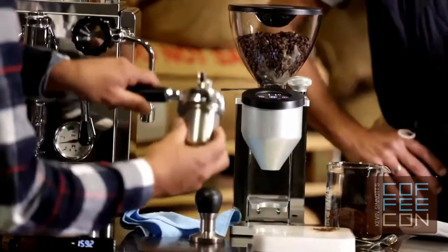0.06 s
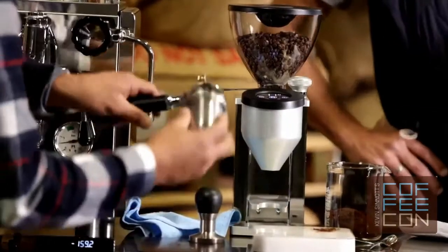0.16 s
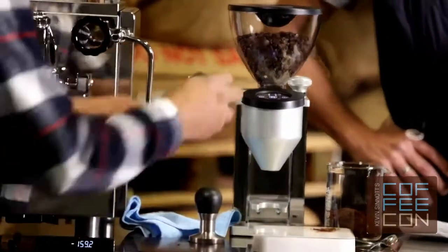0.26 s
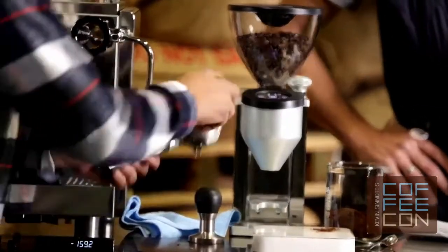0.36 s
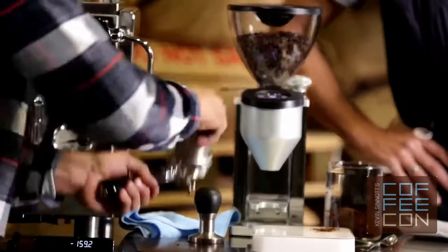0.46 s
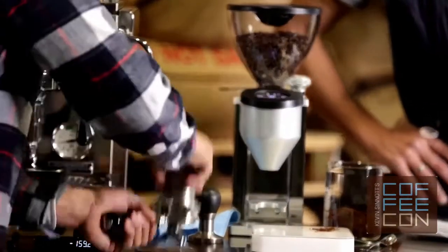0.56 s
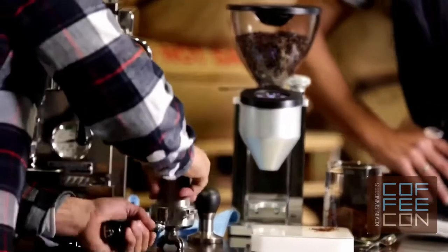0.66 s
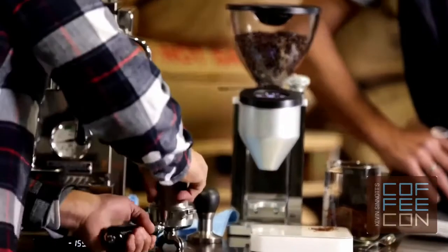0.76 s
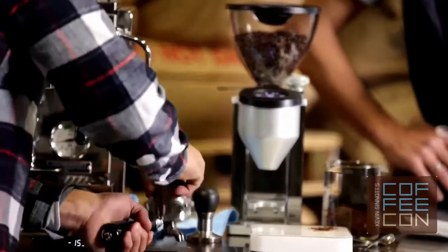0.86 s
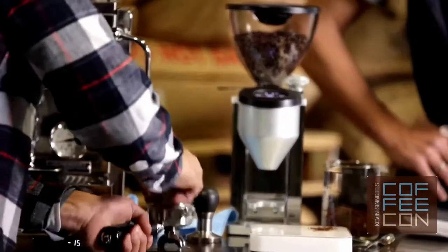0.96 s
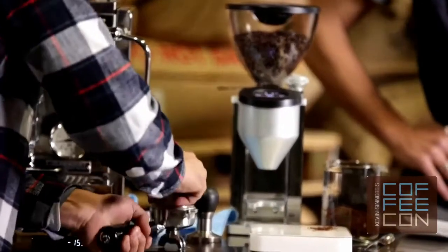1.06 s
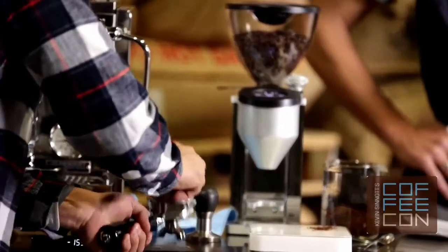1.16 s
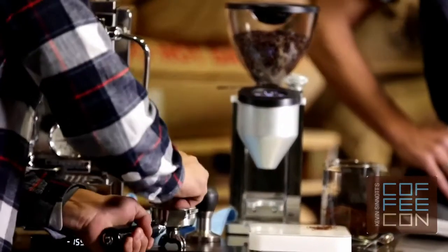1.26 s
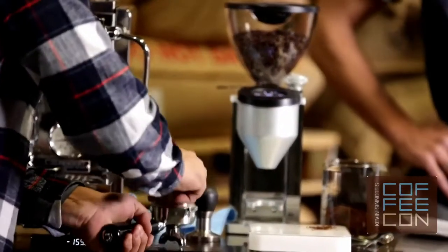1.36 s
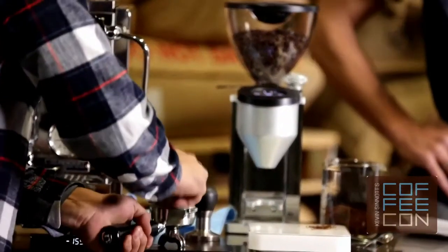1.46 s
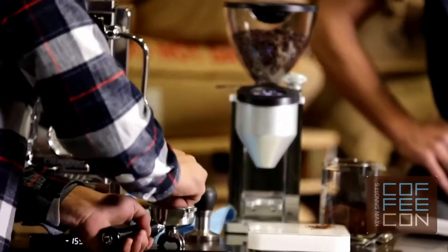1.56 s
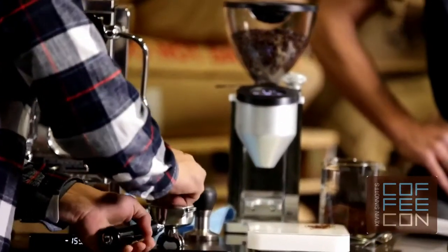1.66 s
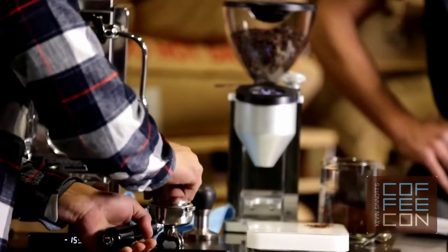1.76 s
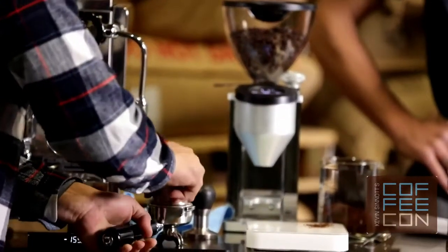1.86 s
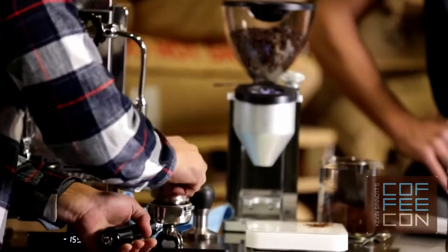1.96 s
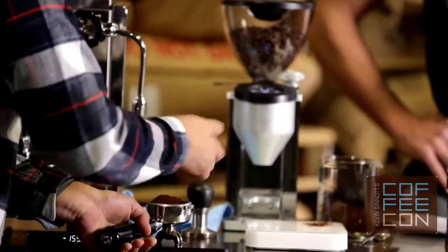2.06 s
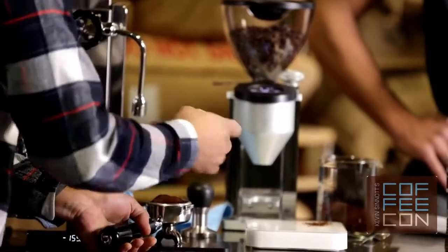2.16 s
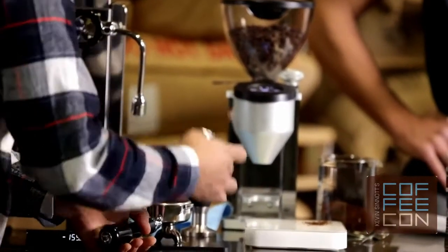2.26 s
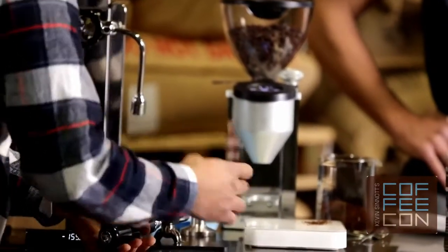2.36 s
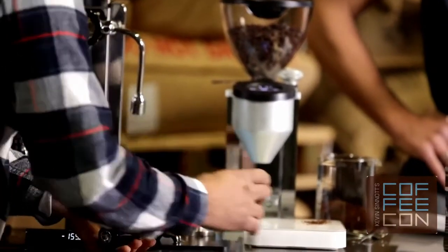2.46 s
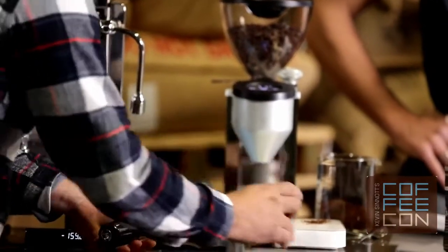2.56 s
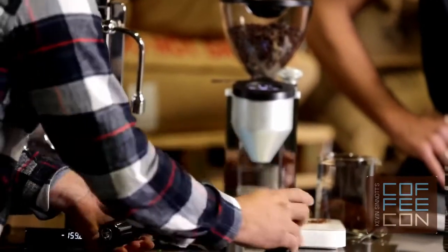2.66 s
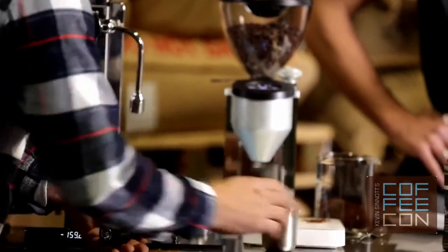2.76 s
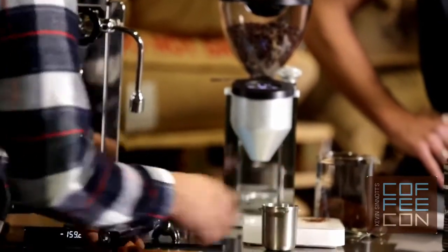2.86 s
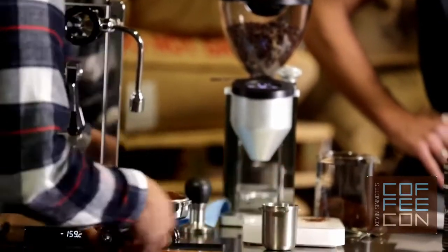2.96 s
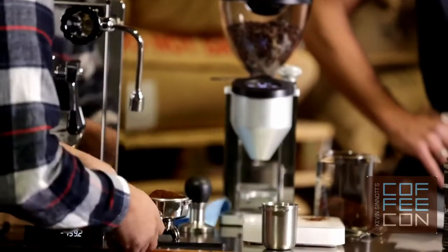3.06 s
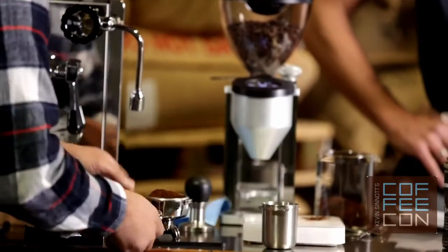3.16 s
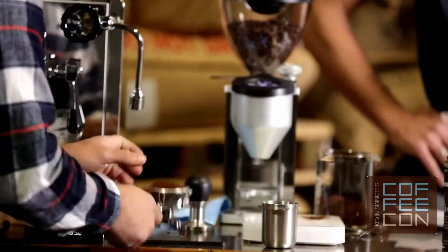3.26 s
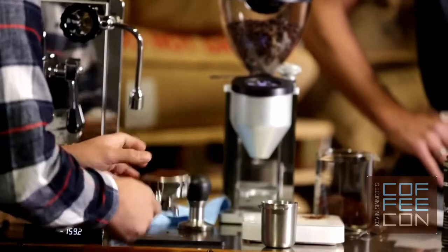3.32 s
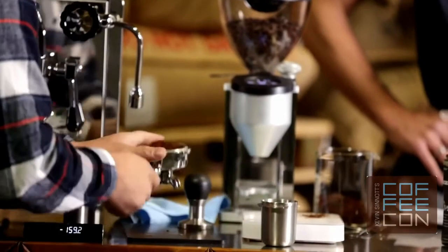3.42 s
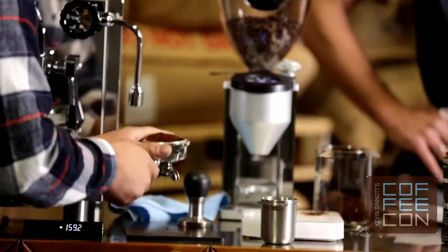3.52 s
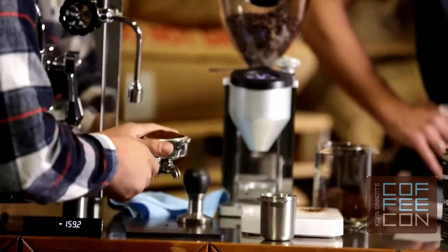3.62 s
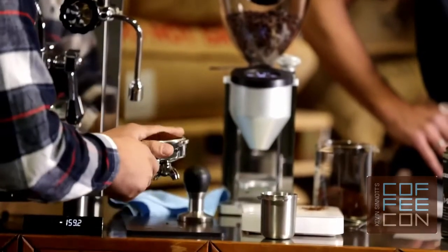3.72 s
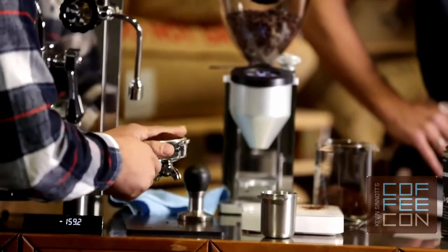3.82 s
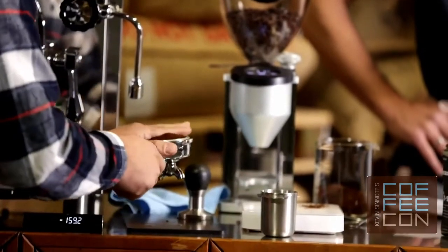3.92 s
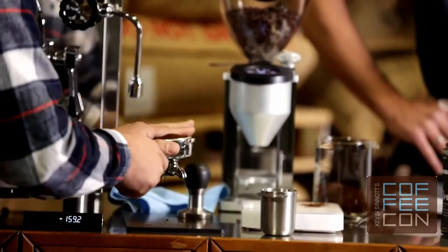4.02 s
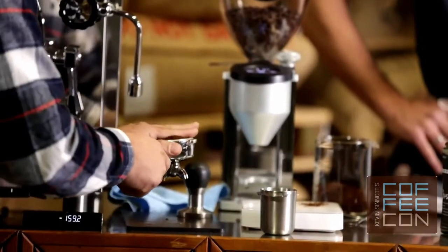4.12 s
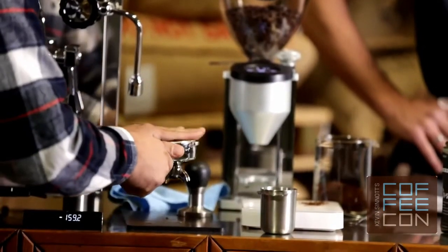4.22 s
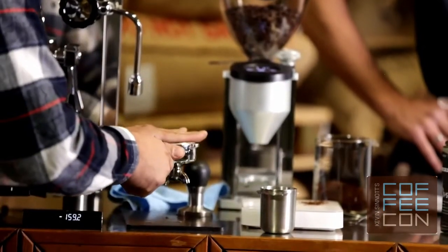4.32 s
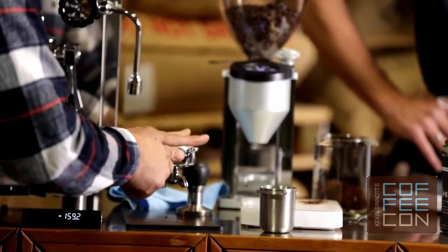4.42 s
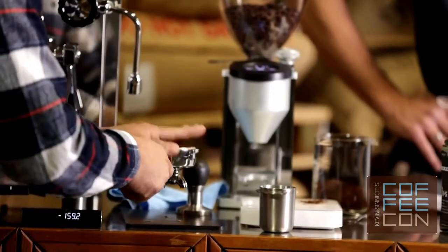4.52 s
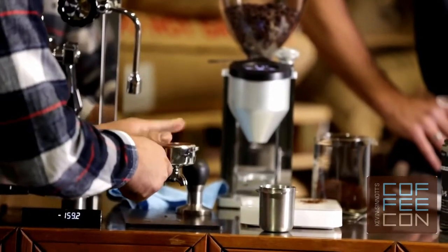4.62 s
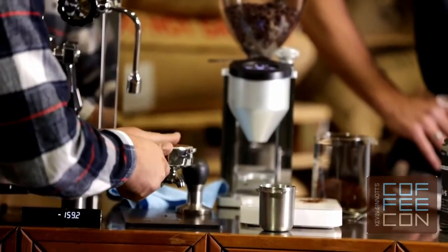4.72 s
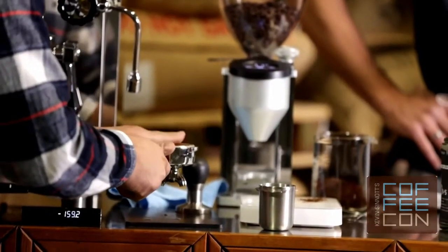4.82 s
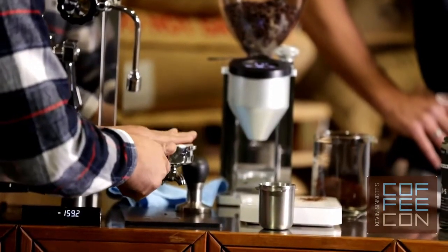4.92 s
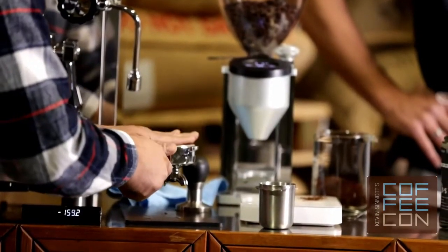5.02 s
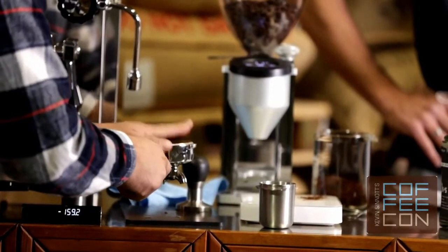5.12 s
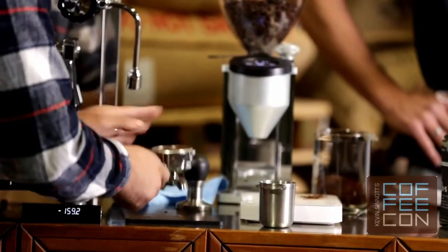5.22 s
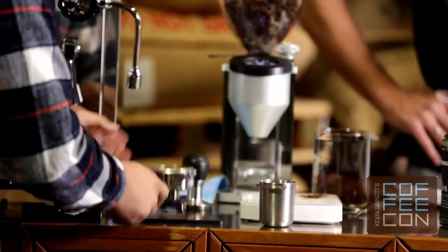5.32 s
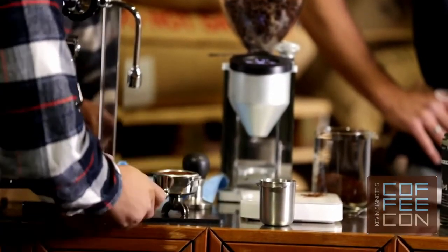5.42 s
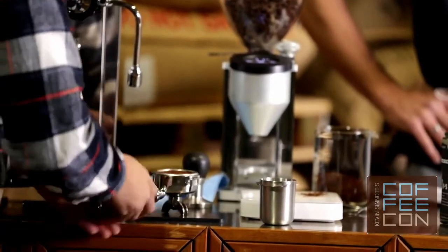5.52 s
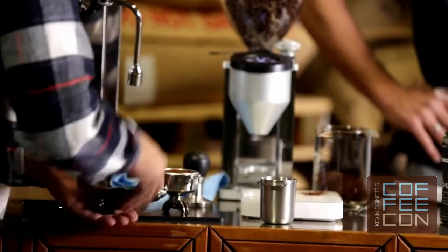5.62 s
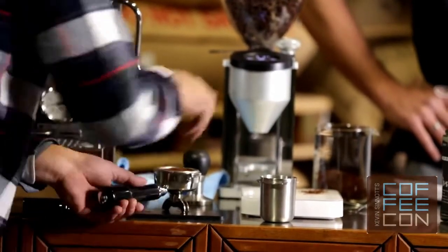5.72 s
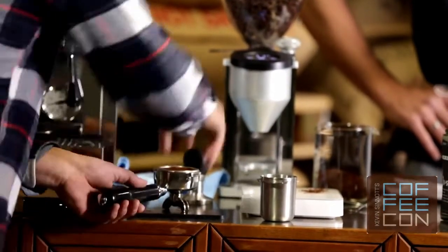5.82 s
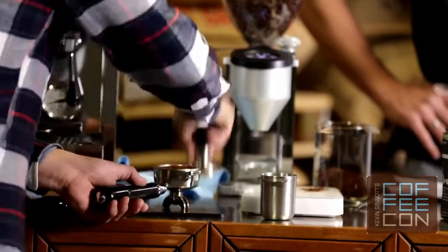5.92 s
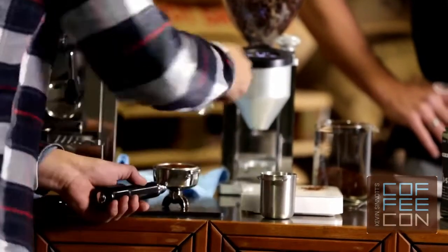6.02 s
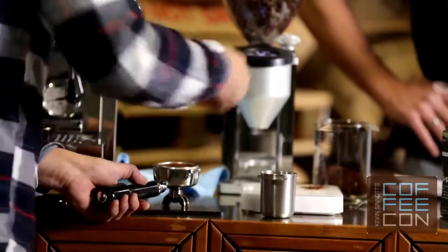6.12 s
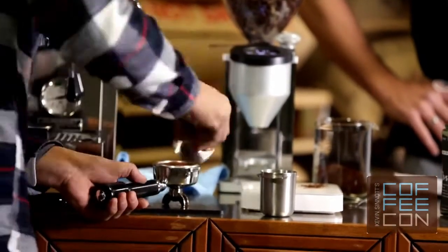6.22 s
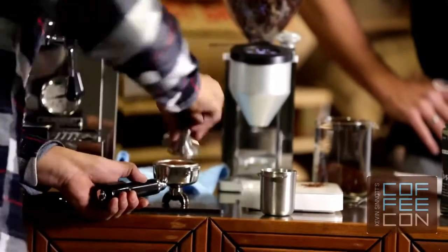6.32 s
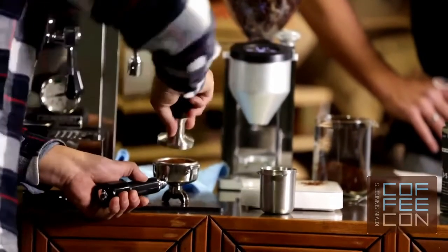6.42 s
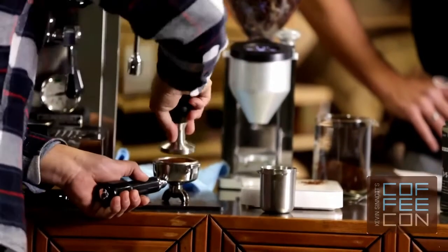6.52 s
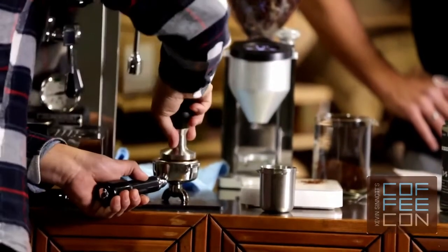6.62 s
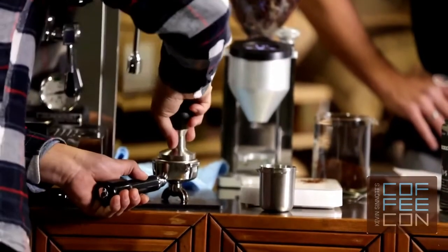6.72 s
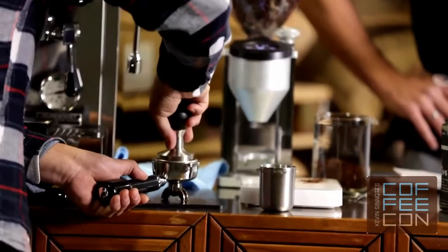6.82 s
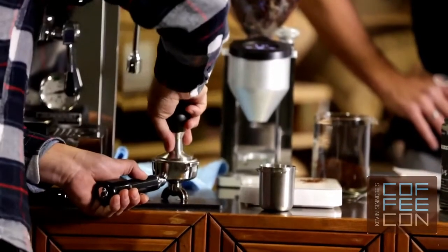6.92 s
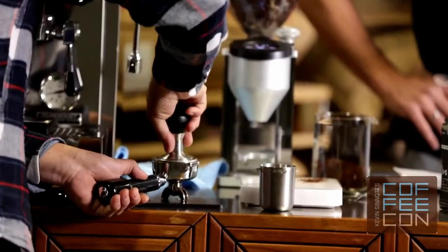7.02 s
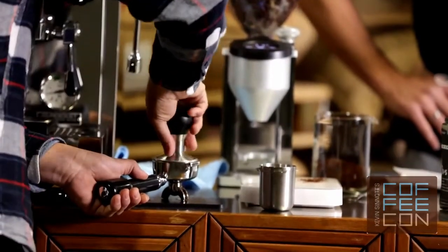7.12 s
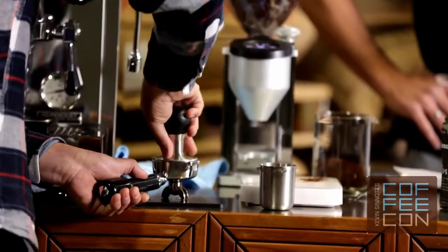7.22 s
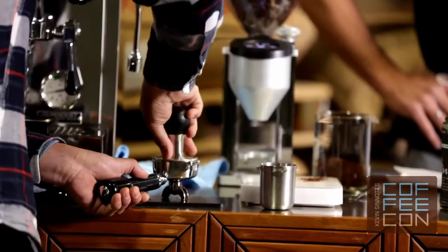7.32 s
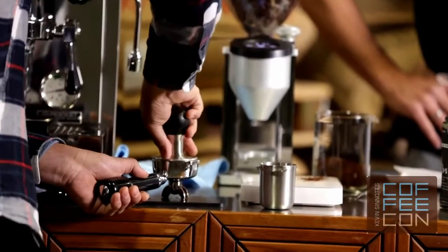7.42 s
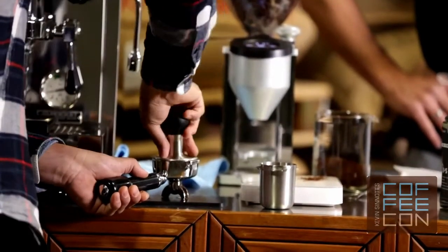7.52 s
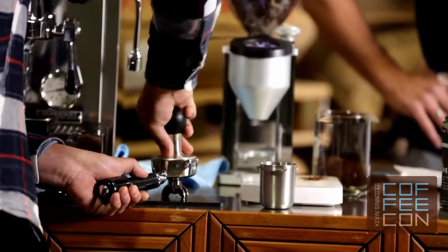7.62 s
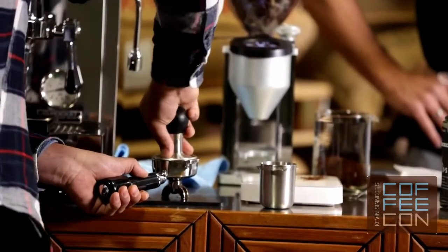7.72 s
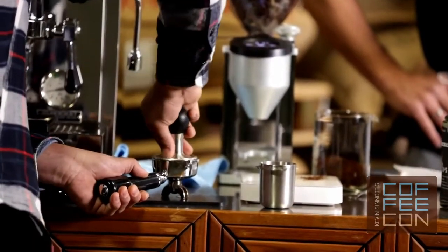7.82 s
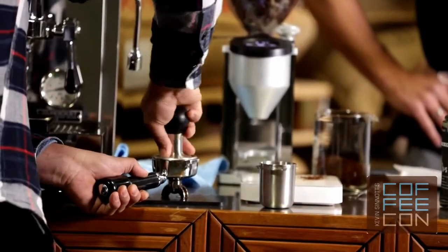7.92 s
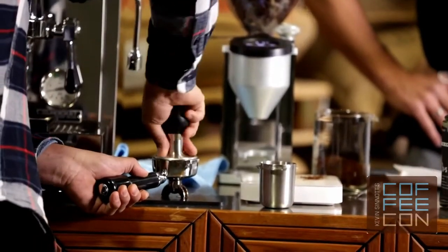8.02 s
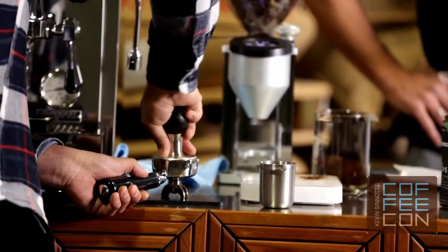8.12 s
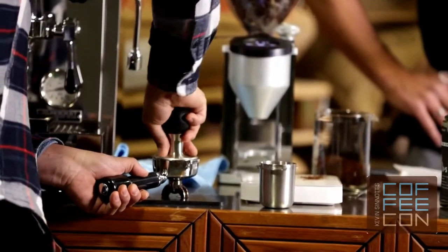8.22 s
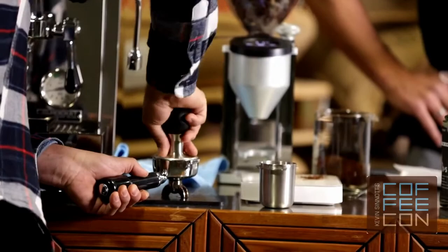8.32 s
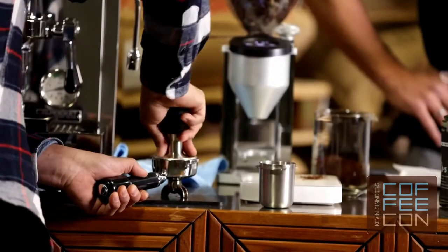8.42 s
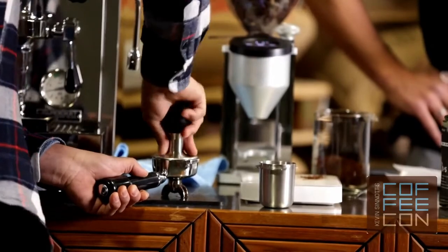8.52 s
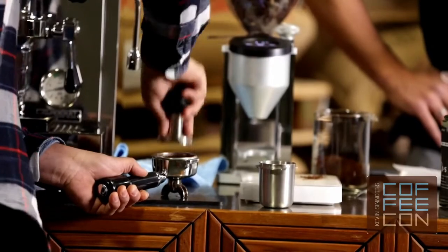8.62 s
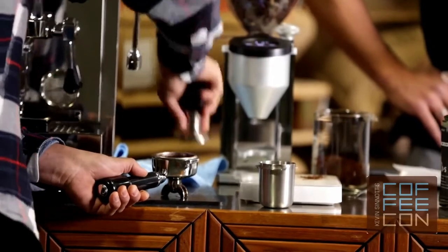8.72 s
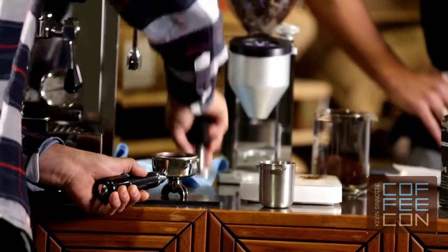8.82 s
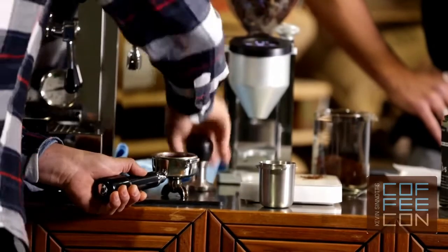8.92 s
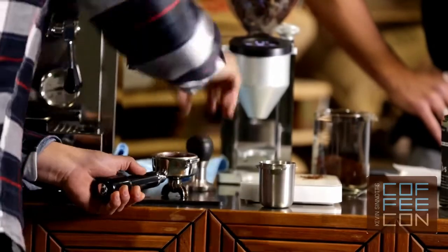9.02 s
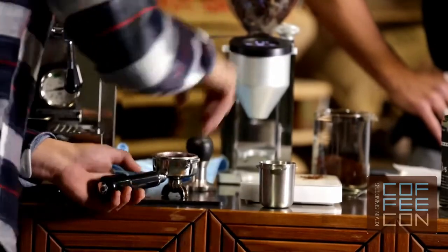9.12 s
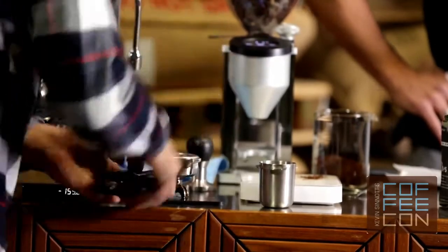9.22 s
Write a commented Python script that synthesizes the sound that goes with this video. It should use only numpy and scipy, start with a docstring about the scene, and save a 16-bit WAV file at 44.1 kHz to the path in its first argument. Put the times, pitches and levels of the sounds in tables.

```python
"""A steel portafilter with a dosing cup on it is tapped on a wooden counter: filtered modes and decaying noise.
Light touches on it give bright clinks and a few dull hollow ticks; the cup lands on one edge, then flat.
Rubs and a run of tamping twists are swells of uneven noise; the tamper knocks on its stand and shudders.
A quiet, fairly large room adds two reflections and a diffuse tail; steady shaped noise is its ventilation."""
import sys
import numpy as np
from scipy import signal
from scipy.fft import rfft, irfft, next_fast_len
from scipy.io import wavfile

SR = 44100
rng = np.random.default_rng(int(sys.argv[2]) if len(sys.argv) > 2 else 0)


def store_pcm(level_fs):
    """Save levels as 16-bit WAV."""
    pcm = np.round(np.clip(level_fs, -1, 1) * 32767).astype(np.int16)
    wavfile.write(sys.argv[1], SR, np.atleast_2d(pcm).T)


N = 408807

# dense upper modes of the wood: freq_hz, density_db_per_hz (relative)
WOOD_SPECTRUM = [(100, -52.5), (220, -14.5), (330, 0), (600, 2.5), (1200, -15), (2000, -32.5),
                 (6000, -43.5)]
LIGHT_CONTACT_HZ = 700   # contact pitch of light knocks on the wood
TAP_CHATTER_T60_S = 0.053


def from_db(db):
    """Decibels to gain."""
    return 10 ** (np.asarray(db) / 20)


def seconds(length_s):
    """Time axis of a short sound."""
    return np.arange(int(length_s * SR)) / SR


def add(track, start_s, sound):
    """Mix a sound into a track at a given time."""
    at = max(round(start_s * SR), 0)
    track[at:at + len(sound)] += sound[:max(N - at, 0)]


def at_hz(points, hz, axis=1):
    """Read a column of a table along log frequency."""
    points = np.array(points)
    return np.interp(np.log(hz + 1e-9), np.log(points[:, 0]), points[:, axis])


def coloured(source, spectrum, tilt_db=0):
    """Give a noise a spectrum, tilted per octave above 500 Hz; rms 1."""
    size = next_fast_len(len(source))
    hz = np.fft.rfftfreq(size, 1 / SR)
    octaves = np.log2(np.maximum(hz, 500) / 500)
    gain = from_db(at_hz(spectrum, hz) + tilt_db * octaves)
    out = irfft(rfft(source, size) * gain, size)[:len(source)]
    return out / np.std(out)


def dying(t, t60_s):
    """Exponential decay, 60 dB down after t60."""
    return np.exp(-np.log(1000) * t / t60_s)


def ring(modes, t, scatter_db):
    """Struck modes: decaying sines, alternating in sign, strengths scattered at every blow."""
    hz, db, t60_s = np.transpose(modes)[:, :, None]
    signs = (-1) ** np.arange(len(db))[:, None]
    gains = from_db(db + scatter_db * rng.standard_normal(db.shape)) * signs
    return np.sum(gains * np.sin(2 * np.pi * hz * t) * dying(t, t60_s), axis=0)


def crack(spectrum, t, t60_s, tilt_db=0):
    """Coloured noise that decays, such as the dense chatter of hard surfaces meeting."""
    return coloured(rng.standard_normal(len(t)), spectrum, tilt_db) * dying(t, t60_s)


def ventilation(level_db=-61.5):
    """Steady air noise, strongest in the bass."""
    # air noise: freq_hz, density_db_per_hz (relative)
    air_spectrum = [(25, -11.5), (50, -18.5), (80, -2), (125, 0.5), (165, -3), (240, -10.5), (320, -10),
                    (450, -13.5), (800, -16), (1300, -24.5), (2700, -30), (5000, -31.5), (10000, -31),
                    (15000, -34.5)]
    return from_db(level_db) * coloured(rng.standard_normal(N), air_spectrum)


def room(dry, build_s=0.0055):
    """Two near reflections, then a diffuse tail that builds up, its decay set band by band."""
    # diffuse tail: freq_hz, tail_db, t60_s
    tail_bands = [(80, -11.5, 1), (160, -14.5, 0.86), (308, -9, 0.75), (700, -19, 0.77),
                  (1480, -14.5, 0.66), (2987, -17.5, 0.634), (6000, -14, 0.31), (13000, -18.5, 0.59)]
    # nearby surfaces: delay_s, level_db
    reflections = [(.0092, -16), (.042, -29.5)]
    t = seconds(1)
    response = np.zeros(len(t))
    edges_hz = np.geomspace(50, 16000, 15)
    for low_hz, high_hz in zip(edges_hz, edges_hz[1:]):
        centre_hz = np.sqrt(low_hz * high_hz)
        band_pass = signal.butter(2, [low_hz, high_hz], "band", fs=SR, output="sos")
        band = signal.sosfilt(band_pass, rng.standard_normal(len(t)))
        build_up = 1 - np.exp(-(t / build_s) ** 2)
        tail = band * dying(t, at_hz(tail_bands, centre_hz, axis=2)) * build_up
        # band energy in proportion to bandwidth
        norm = np.sqrt(2 * (high_hz - low_hz) / SR / np.sum(tail ** 2))
        response += from_db(at_hz(tail_bands, centre_hz)) * tail * norm
    for delay_s, db in reflections:
        response[round(delay_s * SR)] += from_db(db)
    return signal.fftconvolve(dry, response)[:N]


def twists(count=9, start_s=7.45, gap_s=0.137, unevenness=0.14):
    """Equally strong tamper strokes on the grounds, about evenly spaced; columns as in strokes."""
    sigma_s, level_db, tilt_db_per_octave = 0.023, -66, 4.5
    return [(start_s + gap_s * (k + unevenness * late), sigma_s, level_db, tilt_db_per_octave)
            for k, late in enumerate(rng.standard_normal(count))]


def rubbing(grain_db=3.5, judder_db=2.0, judder_hz=70):
    """Each stroke is a Gaussian swell of tiny slips of uneven size, juddering with the hand."""
    # steel sliding on steel, counter or grounds: middle_s, sigma_s, level_db, tilt_db_per_octave
    strokes = [(0.01, 0.05, -63, -4.5), (0.284, 0.063, -63, -3.5), (1.591, 0.18, -57.5, -1.5),
               (5.081, 0.088, -66, -4.5), (5.767, 0.052, -57.5, -4), (5.868, 0.027, -56, 5.5),
               (6.042, 0.045, -62, 0), (6.241, 0.039, -64.5, 3), (9.168, 0.11, -52.5, -1.2)]
    # sliding steel: freq_hz, density_db_per_hz (relative)
    rub_spectrum = [(200, -4), (700, 0), (1250, 2), (1800, -6), (2250, -2), (2600, -3.5), (2920, -3.5),
                    (3450, -13.5), (4300, -7.5), (5200, -8.5), (6100, -12.5), (7000, -7), (7700, -11.5),
                    (8750, -8.5), (10200, -14), (15000, -13)]
    out, t = np.zeros(N), seconds(.6)
    for middle_s, sigma_s, db, tilt_db in strokes + twists():
        start_s = max(middle_s - t[-1] / 2, 0)
        swell = np.exp(-.5 * ((start_s + t - middle_s) / sigma_s) ** 2)
        slip_size = np.minimum(rng.exponential(1, len(t)), 5)
        slips = rng.standard_normal(len(t)) * from_db(grain_db * slip_size)
        judder = np.interp(t * judder_hz, np.arange(len(t)), rng.standard_normal(len(t)))
        add(out, start_s, from_db(db + judder_db * judder) * swell * coloured(slips, rub_spectrum, tilt_db))
    return out


def thump(db, contact_hz, width=0.97, wood_db=-13, wood_t60_s=0.13):
    """The springy contact passes on a broad band of the blow; the wooden top booms and knocks."""
    # counter modes: freq_hz, level_db, t60_s
    counter_modes = [(97.4, -10.5, 0.097), (145.24, -5, 0.24), (166.3, -5.5, 0.19), (188, -29, 0.0484),
                     (213.8, -9, 0.13), (255.6, -10, 0.13), (293, -7, 0.079), (334, -16.5, 0.087),
                     (390.6, -14.5, 0.14), (502.4, -13.5, 0.11), (615.6, -10, 0.074), (732, -17, 0.084),
                     (809.5, -16.5, 0.14), (1145, -11.5, 0.012)]
    t = seconds(.5)
    contact = signal.butter(1, [contact_hz / (1 + width), contact_hz * (1 + width)], "band", fs=SR)
    top = ring(counter_modes, t, scatter_db=2.5) + from_db(wood_db) * crack(WOOD_SPECTRUM, t, wood_t60_s)
    soft = signal.butter(2, min(7 * contact_hz, SR / 3), fs=SR)   # a slow contact has no sharp edge
    return from_db(db) * signal.lfilter(*soft, signal.lfilter(*contact, top))


def clack(db, tilt_db, t60_s, spot_hz, ring_db, grip_shift=0.0057, spot_db=5, spot_q=6):
    """Steel chatters and rings, shifting a little in pitch; the spot struck favours one pitch."""
    # basket modes: freq_hz, level_db, t60_s
    basket_modes = [(2017, -1, 0.027), (2665, -4, 0.047), (3400, -11, 0.12), (4544, -4, 0.037),
                    (4800, -11, 0.094), (5750, -29, 0.023), (6840, -11.5, .07), (8420, -13.5, 0.078),
                    (10140, -10.5, 0.061), (11500, -8, 0.07), (12260, -6, 0.044), (13525, -10, 0.076),
                    (15100, -22.5, 0.049)]
    # steel chatter: freq_hz, density_db_per_hz (relative)
    steel_spectrum = [(150, -20), (400, 4.5), (900, 4.5), (2200, 1.5), (3100, -2.5), (5000, -3), (7500, -5),
                      (12000, -15), (15000, -12.5)]
    t = seconds(.5)
    shifted_t = t * (1 + grip_shift * rng.standard_normal())
    steel = from_db(ring_db) * ring(basket_modes, shifted_t, scatter_db=3.0)
    sound = crack(steel_spectrum, t, t60_s, tilt_db) + steel
    favoured = signal.lfilter(*signal.iirpeak(spot_hz, spot_q, fs=SR), sound)
    return from_db(db) * (sound + from_db(spot_db) * favoured)


def tamper(rumble_db=-16, rumble_t60_s=0.18, lowest_hz=105, contacts=3):
    """The heavy tamper knocks on its stand, dull and short; its steel base shudders, the wood rumbles."""
    # one edge, then flat: start_s, level_db
    tamper_landings = [(8.8632, -11.5), (8.8689, -11.5)]
    # stand modes: freq_hz, level_db, t60_s
    stand_modes = [(123.5, -16, 0.27), (160.4, -2, 0.14), (225, -19, 0.31), (236, 2.5, 0.051),
                   (383, 7.5, 0.02), (426, -10.5, 0.14), (500.5, -6.5, 0.11), (704, -0.5, 0.024),
                   (855, -6, 0.031), (1176, -10.5, 0.025)]
    # each shudder contact is weaker and brighter than the last
    shudder_db, gap_s, loss_db = -29.5, 0.015, 6
    tilt_db, brighten_db, chatter_t60_s, spot_hz = -2.5, 4.5, 0.081, 5060   # tilts per octave
    out, t = np.zeros(N), seconds(.5)
    for start_s, db in tamper_landings:
        knock = ring(stand_modes, t, scatter_db=2.6)
        rumble = from_db(rumble_db) * crack(WOOD_SPECTRUM, t, rumble_t60_s)
        add(out, start_s, from_db(db) * (knock + rumble))
    for k in range(contacts):
        steel = clack(shudder_db - k * loss_db, tilt_db + k * brighten_db, chatter_t60_s, spot_hz, ring_db=-14.5)
        add(out, tamper_landings[0][0] + k * gap_s, steel)
    # low cut: the knock has little below about 105 Hz
    return signal.sosfilt(signal.butter(2, lowest_hz, "high", fs=SR, output="sos"), out)


def dosing_cup(linger_db=-25.0, linger_t60_s=.6, thump_db=-19.5, contact_hz=523):
    """The empty steel cup clacks and knocks on the counter; its ring lingers in the room as dense noise."""
    # one edge, then flat: start_s, level_db
    cup_landings = [(2.6076, -21), (2.614, -26)]
    # cup modes: freq_hz, level_db, t60_s
    cup_modes = [(298, -16.5, 0.17), (598, 1.5, 0.0915), (1073, 0.5, 0.043), (1210, -8, 0.046),
                 (1490, 2.5, .05), (1808, 0, 0.034), (3613, -10.5, 0.054), (3874, -19, 0.026),
                 (4904, -0.5, 0.041), (5100, -16, .04), (5210, -39.5, 0.25), (6450, -15, .05),
                 (9320, -15.5, 0.041), (10340, -24.5, 0.17)]
    # contact chatter: freq_hz, density_db_per_hz (relative)
    cup_spectrum = [(150, -6), (400, 0), (850, -1), (1300, 4), (1900, 0), (2700, -15), (5000, -11),
                    (7500, -20), (10000, -15), (15000, -32)]
    # lingering ring, dense around 5 kHz: freq_hz, density_db_per_hz (relative)
    linger_spectrum = [(700, -28.5), (1100, 8), (1400, -17.5), (1850, -7), (2600, -25.5), (4300, -35),
                       (4830, -7.5), (5100, -0.5), (5600, -17.5), (7500, -27), (10000, -21), (12000, -31)]
    out, t = np.zeros(N), seconds(0.46)
    for start_s, db in cup_landings:
        hit = crack(cup_spectrum, t, t60_s=0.049) + from_db(-4.5) * ring(cup_modes, t, scatter_db=0.0)
        lingering = from_db(linger_db) * crack(linger_spectrum, t, linger_t60_s)
        add(out, start_s, from_db(db) * (hit + lingering))
    add(out, cup_landings[0][0], thump(thump_db, contact_hz))
    return out


def touching(chatter_t60_s=0.04):
    """Light touches: steel chatter and ring, bright or dull by tilt, with a faint knock on the wood."""
    # light touches on the portafilter, bright clinks and a few dull hollow ticks:
    # start_s, level_db, tilt_db_per_octave, spot_hz, counter_knock_db
    touches = [(0.0536, -56, -6.5, 1300, -73), (1.1, -51, -0.5, 1100, -48), (1.846, -37.5, -2, 5100, -33),
               (3.081, -53.5, -3, 1260, -57.5), (4.41, -56, 3.5, 2570, -71), (4.9198, -40, 4.5, 2630, -70),
               (5.429, -54, -5, 1820, -70), (6.6465, -33, -1.5, 2300, -34.5), (6.8562, -44, 0.3, 2240, -43)]
    out = np.zeros(N)
    for start_s, db, tilt_db, spot_hz, knock_db in touches:
        steel = clack(db, tilt_db, chatter_t60_s, spot_hz, ring_db=-10)
        add(out, start_s, steel + thump(knock_db, LIGHT_CONTACT_HZ))
    return out


def tick(db, grip_shift=0.012):
    """The spouts give a short hollow tick: fast-decaying modes, shifting a little in pitch."""
    # spout modes: freq_hz, level_db, t60_s
    spout_modes = [(1304, 5.5, 0.014), (1680, -1.5, 0.018), (2230, -6, 0.012), (3660, -18.5, 0.011),
                   (4120, -23, 0.0052)]
    shifted_t = seconds(.5) * (1 + grip_shift * rng.standard_normal())
    return from_db(db) * ring(spout_modes, shifted_t, scatter_db=3.5)


def spout_contact(db, steel_db=-16, tilt_db=-3, spot_hz=2290, knock_db=-16.5):
    """A spout tick also shakes the basket and the wood a little."""
    shaken = clack(db + steel_db, tilt_db, TAP_CHATTER_T60_S, spot_hz, ring_db=-13)
    return tick(db) + shaken + thump(db + knock_db, LIGHT_CONTACT_HZ)


def tapping(tap_spot_hz=1177):
    """Each tap: the spouts tick, the body thumps and clacks, and the loose basket falls back and rattles."""
    # portafilter on the counter (low contact_hz: soft landing): start_s, thump_db, contact_hz,
    # clack_db, clack_tilt_db_per_octave, spout_lead_s, spout_tick_db
    taps = [(0.581, -12.5, 188, -30.5, -0.6, 0.0015, -40.5), (0.9408, -15.5, 206, -36.5, 1.5, 0.0136, -40),
            (1.042, -34, 140, -50.5, -3, 0.0023, -53), (1.180, -12, 236, -29, -1.5, 0.0252, -20.5),
            (1.4416, -11.5, 233, -29.5, -1, 0.027, -34), (5.3388, -19.5, 130, -48.5, -1, 0.00029, -46.5),
            (5.399, -31.5, 90.5, -63, -3, 0.018, -54), (5.834, -35, 110, -74, 0, 0.031, -42),
            (5.8646, -16.5, 169, -46, 1, 0, -56)]
    rattle_after_s, rattle_db, brighten_db_per_octave = 0.0075, -3, 4   # dB relative to the clack
    rattle_t60_s, rattle_spot_hz = 0.075, 2150
    settle_db = 1.8   # lost with every tap as the basket seats itself
    out = np.zeros(N)
    for k, (start_s, db, contact_hz, steel_db, tilt_db, lead_s, spout_db) in enumerate(taps):
        add(out, start_s - lead_s, spout_contact(spout_db))
        body = clack(steel_db, tilt_db, TAP_CHATTER_T60_S, tap_spot_hz, ring_db=-12.5)
        add(out, start_s, thump(db, contact_hz) + body)
        rattle = clack(steel_db + rattle_db - k * settle_db, tilt_db + brighten_db_per_octave,
                       rattle_t60_s, rattle_spot_hz, ring_db=-3.0)
        add(out, start_s + rattle_after_s, rattle)
    return out


def scene(low_cut_hz=72, order=3):
    """All the handling, its room sound and the steady ventilation."""
    handling = tapping() + touching() + dosing_cup() + tamper() + rubbing()
    # low cut, as of a microphone: little is heard below about 70 Hz
    low_cut = signal.butter(order, low_cut_hz, "high", fs=SR, output="sos")
    handling = signal.sosfilt(low_cut, handling)
    return (handling + room(handling) + ventilation())[None]


def record(dry, cutoff_hz=15200):
    """The top is cut steeply by an elliptic low-pass."""
    return signal.sosfilt(signal.ellip(10, .1, 70, cutoff_hz, fs=SR, output="sos"), dry)


dry = scene()
out = record(dry)
store_pcm(out)
```